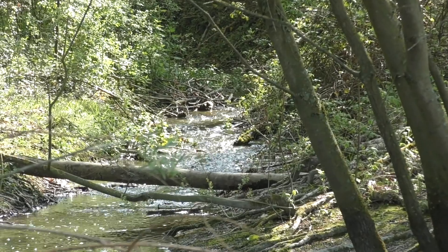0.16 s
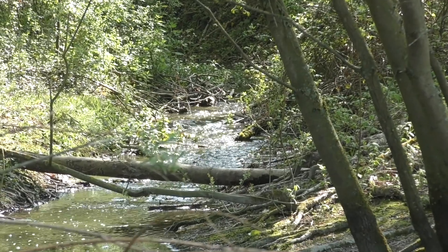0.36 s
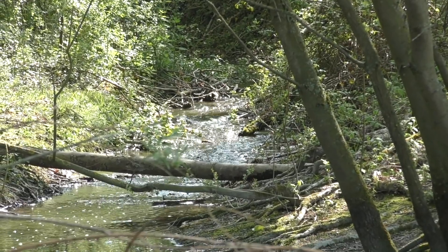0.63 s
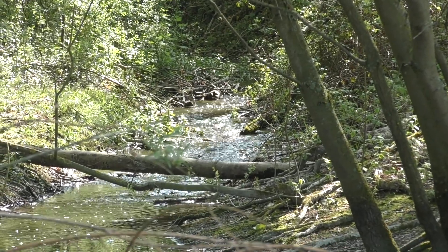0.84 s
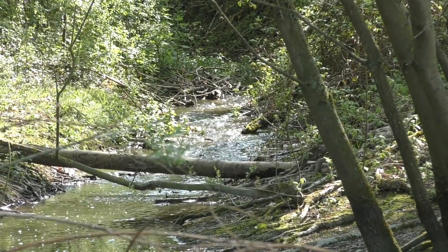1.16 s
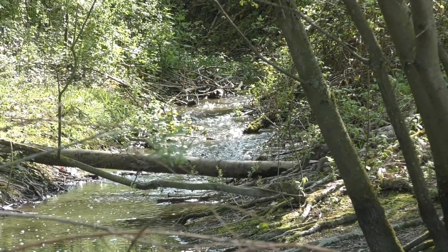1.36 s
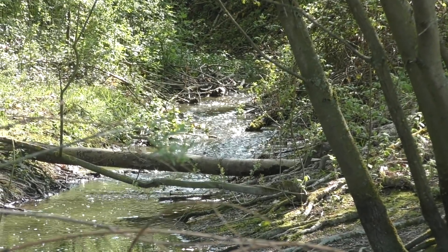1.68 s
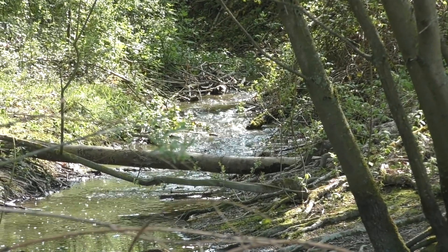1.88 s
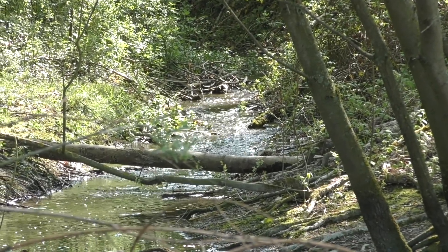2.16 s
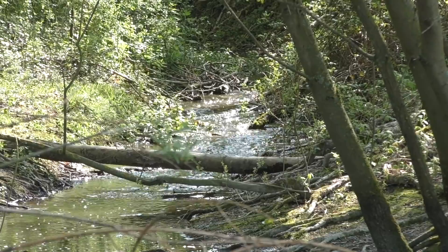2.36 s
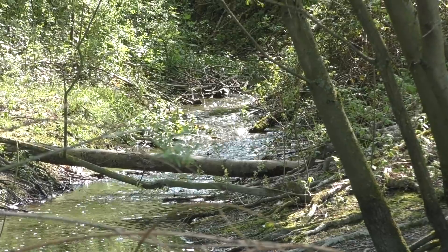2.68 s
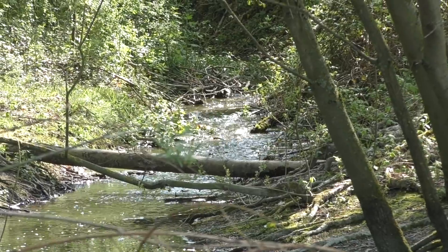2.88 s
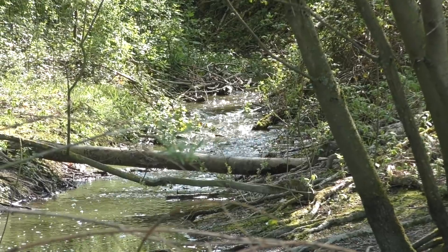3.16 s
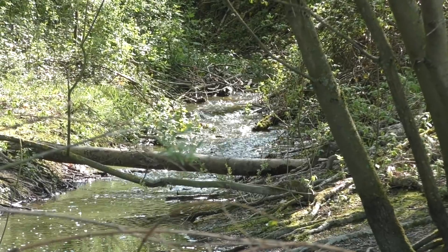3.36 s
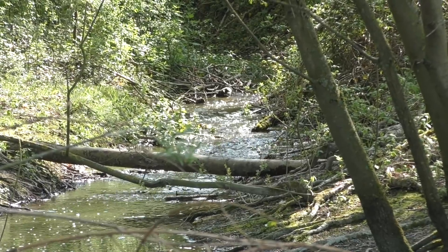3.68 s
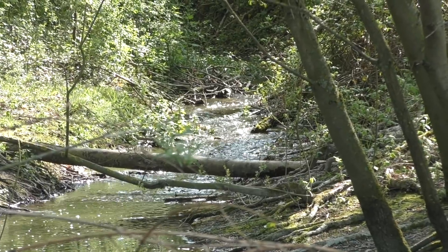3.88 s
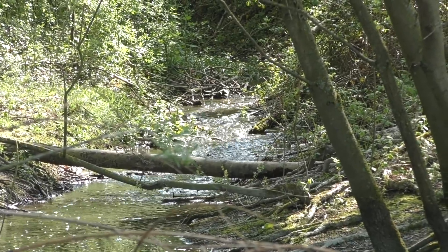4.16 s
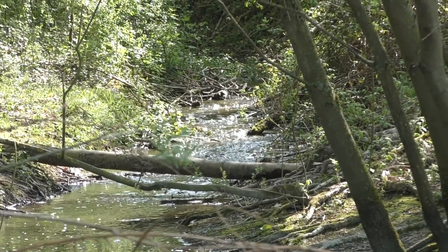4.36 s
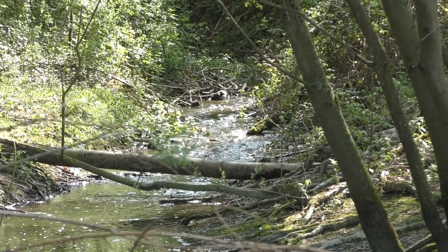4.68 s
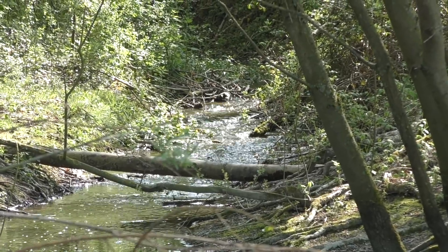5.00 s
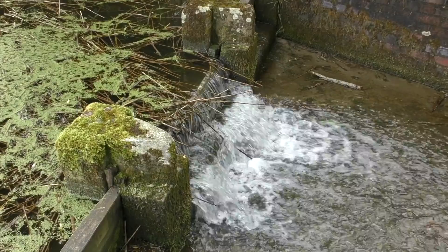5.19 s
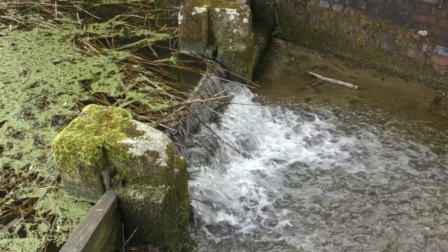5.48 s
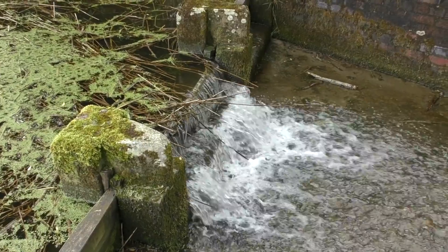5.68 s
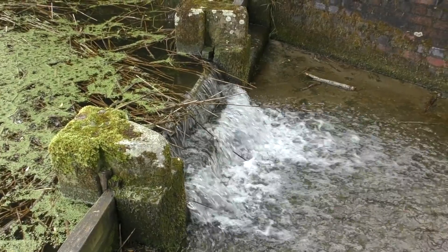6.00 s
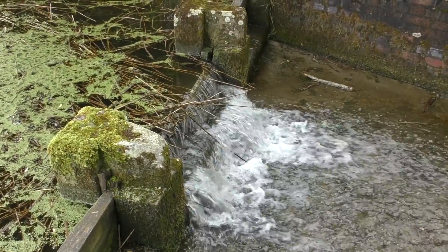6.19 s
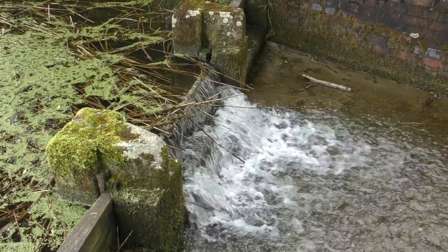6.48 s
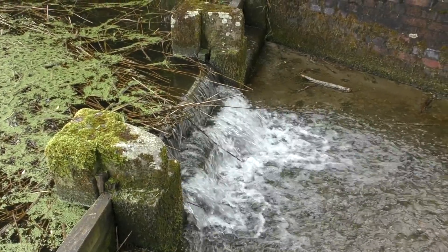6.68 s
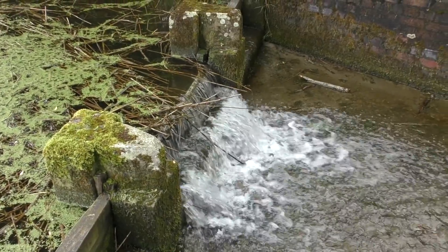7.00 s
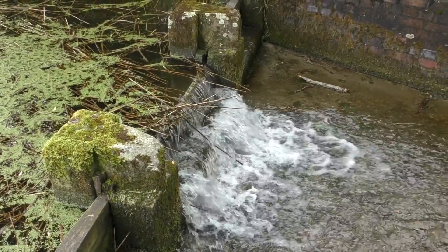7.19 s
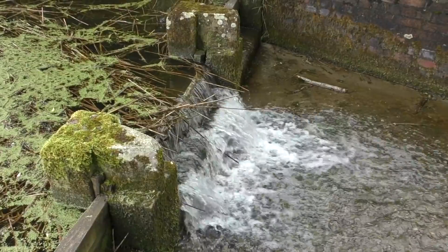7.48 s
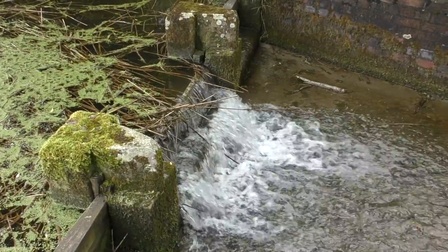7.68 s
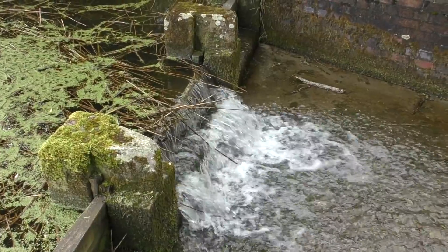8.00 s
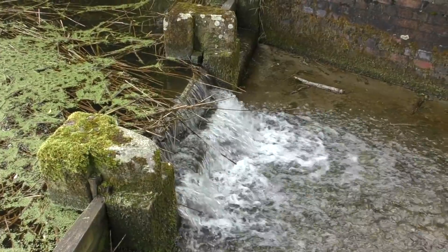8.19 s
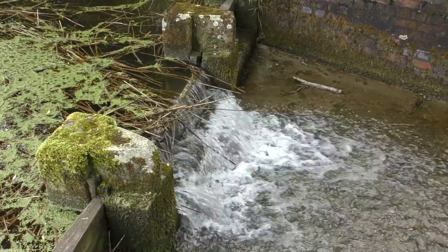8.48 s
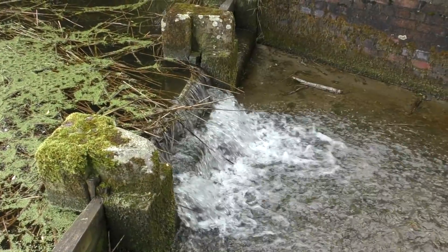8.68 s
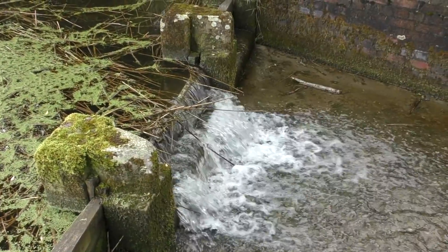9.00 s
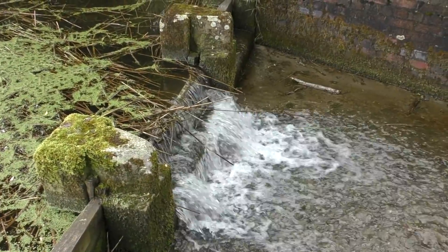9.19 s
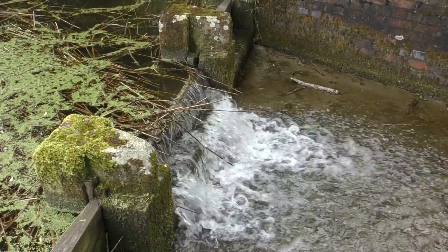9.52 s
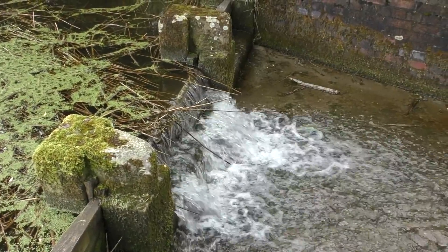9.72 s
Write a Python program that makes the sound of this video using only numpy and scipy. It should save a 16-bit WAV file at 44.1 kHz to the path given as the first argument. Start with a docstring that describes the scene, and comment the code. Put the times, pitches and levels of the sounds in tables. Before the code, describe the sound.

From 0 to 5.15 s a quiet wood, wide and echoing, with a distant brook's even wash and a low airy rumble that slowly eases. A small bird, slightly left, repeats a fast low-high see-saw phrase three times in the first 0.7 s; clear slurred whistles follow until about 2.7 s, while a buzzing, rapid trill runs from 1.0 to 2.2 s. Faint mewing cries come at 0.5-2.3 s, 3.5, 4.0 and 4.9 s, among distant peeps. Light handling ticks fall near 0.6, 2.4, 3.6 and 5.0 s. At 5.15 s it cuts abruptly to a loud, close, central weir: steady mid-range roar, dense bubbling and bright spray fizz, surging only slightly. Dull low handling bumps land at 5.16 and, stronger, 5.5 s, their rumble fading quickly. Watery gulps and short slaps poke out irregularly until the end near 10 s.

```python
"""Woodland birds, then a weir

Small birds sing a see-saw phrase, whistles and a trill in a wood, over a distant brook and farther cries.
Then, all at once, a low stone weir is close by: water plunges into a pool, with bubbles and fine spray.
Bird notes are sliding pure tones with echoes; the water is patchy noise, ringing bubbles and tiny impacts.
The hand-held camera ticks softly, mostly in the wood, and is bumped twice at the weir."""
import sys
import numpy as np
from scipy import signal
from scipy.fft import rfft, irfft, next_fast_len
from scipy.io import wavfile

SR = 44100
rng = np.random.default_rng(int(sys.argv[2]) if len(sys.argv) > 2 else 0)


def dump(signal):
    """Clip the signal to [-1, 1] and save it as 16-bit WAV at the path in sys.argv[1]."""
    limited = np.clip(np.atleast_2d(signal).T, -1, 1)
    pcm = np.round(limited * 32767).astype(np.int16)
    wavfile.write(sys.argv[1], SR, pcm)


N = 434385
TIME = np.arange(N) / SR  # seconds
WEIR_START = 5.153  # seconds

# Bird levels in these tables are set before among_trees() trims and places all the birds.
SEESAW_START, SEESAW_PERIOD_S = -0.031, 0.243  # the very start of the first phrase is cut off
# One see-saw phrase: a low note, an upward flick and a high note. Each row: delay in seconds, length in
# seconds, pitch in Hz, slide and bend as shares of the pitch, level in dB the first time round.
SEESAW_PHRASE = [(0, 0.09, 5220, -0.0047, 0.024, -46.5), (.02, 0.015, 5650, 0.14, -0.025, -48),
                 (.085, .09, 7600, -.02, -0.039, -50)]
# Slurred whistles. Each row: start in seconds, length in seconds, middle pitch in Hz, slide as a share of
# the pitch, level in dB.
WHISTLE_NOTES = [ (.13, .06, 7250, -.1, -55), (.712, .1, 3860, -0.003, -46.5),
                 (.885, 0.14, 5830, -0.009, -47.5), (.97, .1, 3185, -0.071, -56),
                 (1.39, 0.083, 4090, -0.031, -53), (1.525, 0.055, 3720, -.11, -53),
                 (1.65, 0.037, 3870, 0.14, -56), (2.19, .13, 7060, -0.064, -52.5),
                 (2.36, 0.09, 2500, -0.063, -61), (2.565, .03, 5200, -.19, -63),
                 (2.625, .04, 4130, 0.069, -53), (2.705, .032, 3370, 0.038, -61),
                 (4.23, 0.19, 3500, .005, -68)]
TRILL_START, TRILL_RATE, TRILL_DB = 1.04, 10.4, -49.5  # seconds, syllables a second, dB
# The range one trill syllable buzzes over. Each row: share of the syllable, low limit in Hz, high limit in Hz.
SYLLABLE_RANGE = [(0, 5600, 6400), (.18, 4800, 6050), (.38, 4366, 5520), (.75, 4430, 5200), (1, 4350, 5850)]
# Mewing cries. Each row: start in seconds, length in seconds, middle pitch in Hz, slide as a share of the
# pitch, level in dB, level of the octave in dB above that.
CRY_NOTES = [ (.545, .085, 2060, -.02, -58, -20), (.555, 0.056, 2276, 0.045, -60, -20),
             (.82, 0.2, 1675, -0.037, -65.5, -2), (1.262, .15, 1810, -0.018, -67, -11),
             (2.109, 0.24, 1660, -0.088, -61, -0.5), (2.221, 0.099, 1800, -0.045, -66, -12),
             (3.496, .14, 1863, .04, -69, 2), (4.04, .15, 1900, -0.015, -67, -5),
             (4.851, 0.11, 1936, -0.029, -61.5, -5.5), (5.08, 0.055, 1990, -0.12, -61, -15)]
# How long the echo tail rings among the trees. Each row: frequency in Hz, seconds to fall by 60 dB.
TREE_DECAY = [(1000, 0.41), (4000, 1), (8000, 1)]

# The tone of the plunging water; only its shape counts. Each row: frequency in Hz, strength in dB per Hz.
PLUNGE_SPECTRUM = [(12, -36), (20, 1.5), (86, -20), (156, -8), (197, -14), (226, -7.5), (305, -6),
                   (385, -1.5), (611, -2), (770, -1.5), (926, 0.5), (1540, -2), (3620, -4), (4250, -7),
                   (5000, -21.5), (6500, -55), (11000, -120)]
PLUNGE_DB = -22  # before the surges
# The tone of the spray; only its shape counts. Each row: frequency in Hz, strength in dB per Hz.
SPRAY_SPECTRUM = [(2940, -15.5), (5000, -10.5), (5870, 2), (6580, -9), (8220, -6), (11500, -12),
                  (15500, -25)]
SPRAY_DB = -37  # before the surges
SURGE_DB, SURGE_S = 0.28, 0.41  # typical depth of the random surges, and how long each one lasts roughly
# The largest air pockets gulping in the pool. Each row: start in seconds, level in dB before a trim shared
# by all gulps, pitch in Hz.
GULP_EVENTS = [(5.903, -18, 615), (6.047, -27, 556), (6.251, -16, 603), (6.437, -18.5, 427),
               (6.714, -18, 348), (8.038, -18.5, 412), (8.373, -22, 525), (8.573, -27, 560),
               (8.705, -27, 636), (8.789, -17, 537), (9.149, -17, 485), (9.333, -14.5, 448)]
# Lumps of water slapping the pool. Each row: start in seconds, level in dB relative to the other slaps.
SLAP_EVENTS = [(5.516, -5), (5.804, -11), (6.49, -7), (6.563, -11), (7.464, -7.5), (7.643, -5.5),
               (7.997, -14), (8.404, -6.5), (8.55, -9), (9.147, -7.5)]
# The tone of a slap; only its shape counts. Each row: frequency in Hz, strength in dB per Hz.
SLAP_SPECTRUM = [(200, -37), (800, -4), (1500, 8.0), (2500, -2.0), (4000, -13), (5000, -24), (12000, -32)]

# Small ticks of the camera body. Each row: start in seconds, knock level in dB, knock pitch in Hz, level in
# dB of the click's noise before it is filtered.
CAMERA_TICKS = [(.589, -33, 332, -58), (2.449, -35, 320, -60), (2.757, -52, 300, -59),
                (3.567, -35, 300, -49), (4.079, -55, 250, -40), (4.98, -40.5, 370, -64)]
# Dull bumps on the camera. Each row: start in seconds, level in dB, seconds to fall by 60 dB, rumble level
# in dB.
CAMERA_BUMPS = [(5.158, -27.5, 0.21, -34), (5.498, -21.5, 0.55, -37.5)]
# The tones a bump rings in the mount. Each row: pitch in Hz, level in dB relative to the bump, share of the
# bump's fall time.
MOUNT_MODES = [(82.3, 0.5, 1), (116, -5, .6), (146, -10, 0.56)]
# The tone of the rumble from the hand; only its shape counts. Each row: frequency in Hz, strength in dB per Hz.
HAND_SPECTRUM = [(5, -13.5), (20, 12), (55, -5), (130, 2.0), (220, -33), (1000, -80)]

# The tone of the background in the wood; only its shape counts. Each row: frequency in Hz, strength in dB
# per Hz.
WOOD_SPECTRUM = [(20, -11), (64, 7), (165, 3), (290, -2), (335, -1), (460, -8), (570, -12.5), (830, -13.5),
                 (1130, -8.5), (2800, -16), (3600, -17.5), (6200, -31.5), (11500, -28), (15500, -28.5)]
WOOD_DB = -52  # before the low rumble is set to its own level
RUMBLE_DB, RUMBLE_EASE_DB_PER_S = -55.5, 0.84  # level at first, and the loss a second
# How wide the wood sounds. Each row: frequency in Hz, level in dB of the side signal against the middle.
WOOD_WIDTH = [(60, -5), (110, -4), (200, -7), (380, -9.5), (700, -12), (1290, -7.5), (2380, -6), (4400, -4),
              (8120, -14), (15000, 1)]


def amp(db):
    """Turns decibels into a gain."""
    return 10 ** (np.asarray(db) / 20)


def unit(x):
    """Scales a sound to an average (rms) level of 1."""
    return x / np.sqrt(np.mean(x ** 2) + 1e-20)


def read(points, hz):
    """Reads a two-column table at any frequency, in straight lines on a log-frequency axis."""
    f, value = np.transpose(points)
    return np.interp(np.log(hz + 1), np.log(f + 1), value)


def add(mix, s, sound):
    """Adds a sound to the mix at time s, cutting off whatever falls outside."""
    start = round(s * SR)
    sound = sound[max(-start, 0):]
    part = mix[max(start, 0):][:len(sound)]
    part += sound[:len(part)]


def shape(x, spectrum):
    """Weakens or strengthens each frequency by a table in dB."""
    size = next_fast_len(N + 4096)
    gain = amp(read(spectrum, np.fft.rfftfreq(size, 1 / SR)))
    return irfft(rfft(x, size) * gain, size)[:N]


def colour(x, spectrum):
    """Shapes a sound by a spectrum, then scales it to rms 1."""
    return unit(shape(x, spectrum))


def smooth(x, steps):
    """Makes random values drift, each one remembering the last few steps; rms 1."""
    return unit(signal.lfilter([1], [1, -np.exp(-1 / steps)], x))


def glide(length, hz, slide, bend, waver=0.0081):
    """Phase of a note sliding through its middle pitch, bent into an arch (bend > 0) or a dip."""
    u = np.linspace(-1, 1, int(length * SR))
    pitch = hz * (1 + slide * u / 2 - bend * u ** 2)
    drift = smooth(rng.standard_normal(SR), 62)[:len(u)]
    pitch = pitch * (1 + waver * drift)
    return 2 * np.pi * np.cumsum(pitch) / SR


def note(phase, db, edges=0.14):
    """A pure tone with soft ends; edges is the share of it spent fading in and out."""
    return amp(db) * unit(np.sin(phase) * signal.windows.tukey(len(phase), edges))


def seesaw(count=3, fade_db=-1.0):
    """One bird repeats its low-high phrase at an even pace, a little softer each time."""
    out = np.zeros(N)
    for k in range(count):
        phrase_start = SEESAW_START + k * SEESAW_PERIOD_S
        for delay, length, hz, slide, bend, db in SEESAW_PHRASE:
            phase = glide(length, hz, slide, bend, waver=.016)
            add(out, phrase_start + delay, note(phase, db + k * fade_db))
    return out


def whistles(arch=0.0126):
    """Single slurred notes, pure tones whose pitch is slightly arched."""
    out = np.zeros(N)
    for s, length, hz, slide, db in WHISTLE_NOTES:
        add(out, s, note(glide(length, hz, slide, arch), db))
    return out


def trill(count=12, high_db=-5, buzz_hz=143):
    """A run of like syllables: the pitch buzzes fast between a low and a high limit, softer up high."""
    out = np.zeros(N)
    u = np.linspace(0, 1, int(SR / TRILL_RATE))
    share, *limits = np.transpose(SYLLABLE_RANGE)
    low_hz, high_hz = (np.interp(u, share, limit) for limit in limits)
    for k in range(count):
        # each syllable buzzes at a slightly different speed
        cycles = buzz_hz * u / TRILL_RATE * rng.uniform(.9, 1.1)
        buzz = np.sin(np.pi * (cycles + rng.random())) ** 2
        hz = low_hz + (high_hz - low_hz) * buzz
        softening = amp(high_db * (hz - hz.min()) / np.ptp(hz))
        tone = np.sin(2 * np.pi * np.cumsum(hz) / SR) * softening
        syllable = unit(tone * signal.windows.tukey(len(u), .12))
        add(out, TRILL_START + k / TRILL_RATE, amp(TRILL_DB) * syllable)
    return out


def cries(arch=0.0395):
    """A farther bird's mewing cries: an arched tone and its octave."""
    out = np.zeros(N)
    for s, length, hz, slide, db, octave_db in CRY_NOTES:
        phase = glide(length, hz, slide, arch, waver=0.0071)
        octave = note(2 * phase, db + octave_db, edges=0.44)
        add(out, s, note(phase, db, edges=0.19) + octave)
    return out


def far_birds(count=12, centre_hz=3500, scatter=0.0402, length_s=0.124, slide=.04, level_db=-71):
    """Faint peeps from deep in the wood: short soft-edged tones at loose intervals."""
    out = np.zeros(N)
    for k, (when, pitch, tilt) in enumerate(rng.uniform(-0.9, 1, (count, 3))):
        phase = glide(length_s, centre_hz * (1 + scatter * pitch), slide * tilt, 0)
        s = (k + .5 + when / 2) * WEIR_START / count
        add(out, s, note(phase, level_db, edges=.5))
    return out


def echoes(x, early_db=-4, tail_db=-7, early_s=0.065):
    """Near trunks scatter a cluster of early echoes; the wood beyond adds a long tail."""
    t = np.arange(SR) / SR
    # about 2500 echoes a second, of random strength
    early, late = rng.standard_normal((2, SR)) * (rng.random((2, SR)) < 2500 / SR)
    hz, age, z = signal.stft(late, SR, nperseg=256)
    fall_db = -60 * age / read(TREE_DECAY, hz)[:, None]
    tail = signal.istft(z * amp(fall_db), SR)[1][:SR]
    response = amp(early_db) * unit(early * np.exp(-t / early_s)) + amp(tail_db) * unit(tail)
    return signal.oaconvolve(x, response / np.sqrt(SR))[:N]


def among_trees(song, direct_db=-4.0, side_db=-5, left_db=1.0):
    """The birds sit a little to the left; their echoes come from all sides."""
    mid = amp(direct_db) * song + echoes(song)
    side = amp(side_db) * echoes(song)
    return np.array([amp(left_db) * (mid + side), amp(-left_db) * (mid - side)])


def weir(bubble_db=0, drop_db=-5, spray_follow=0.86):
    """Churning foam and bubbles make the roar; bursting droplets make the fizz above it."""
    # the flow over the sill surges at random
    surge_db = SURGE_DB * smooth(rng.standard_normal(N), SURGE_S * SR)
    foam = churn(patch_db=1.4, patch_s=0.0082, patch_hz=500, flicker_db=0.9, flicker_s=0.0075)
    ringing = bubbles(per_s=7000, spread_db=2.0, cycles=6.4, rise=0.033, small_bias=1.3)
    roar = colour(foam + amp(bubble_db) * ringing, PLUNGE_SPECTRUM) * amp(PLUNGE_DB + surge_db)
    mist = churn(patch_db=1.6, patch_s=0.012, patch_hz=1200, flicker_db=0.36, flicker_s=0.004)
    drops = unit(impacts(per_s=2400, spread_db=5.5))
    fizz = colour(mist + amp(drop_db) * drops, SPRAY_SPECTRUM) * amp(SPRAY_DB + spray_follow * surge_db)
    return roar + fizz + splashes()


def churn(patch_db, patch_s, patch_hz, flicker_db, flicker_s):
    """White noise broken into patches of time and frequency, with a flicker shared by all bands."""
    z = signal.stft(rng.standard_normal(N), nperseg=256, noverlap=192)[2]
    frame_s, bin_hz = 64 / SR, SR / 256
    over_time = smooth(rng.standard_normal(z.shape), patch_s / frame_s)
    patches = smooth(over_time.T, patch_hz / bin_hz).T
    flicker = smooth(rng.standard_normal(z.shape[1]), flicker_s / frame_s)
    gain = amp(patch_db * patches + flicker_db * flicker)
    return unit(signal.istft(z * gain, nperseg=256, noverlap=192)[1][:N])


def impacts(per_s, spread_db):
    """Random impulses of either sign, mostly small and a few large."""
    chance, size = rng.random(N), rng.exponential(1, N)
    strength = amp(spread_db * np.minimum(size, 4))
    return (chance < per_s / SR) * strength * rng.choice([-1, 1], N)


def bubble(hz, cycles, rise):
    """An air pocket rings a few cycles, rising in pitch as it nears the surface."""
    age = np.arange(int(5 * cycles * SR / hz)) * hz / SR  # in cycles
    return np.sin(2 * np.pi * age * (1 + rise * age / cycles / 2)) * np.exp(-age / cycles)


def bubbles(per_s, spread_db, cycles, rise, small_bias, count=38):
    """A cloud of bubbles: large low ones are rare, small high ones crowd together."""
    pitches, out = np.geomspace(150, 4800, count), np.zeros(N)
    births = impacts(per_s, spread_db)
    shares = np.cumsum(pitches ** small_bias)
    kind = np.searchsorted(shares / shares[-1], rng.random(N))  # which pitch each birth gets
    for k, hz in enumerate(pitches):
        group = signal.oaconvolve(births * (kind == k), bubble(hz, cycles, rise))[:N]
        out += np.sqrt(hz) * unit(group)
    return unit(out)


def splashes(gulp_db=-4, slap_db=-7, slap_s=0.0034):
    """Single gulps and slaps stand out of the roar; a slap swells and dies within milliseconds."""
    out, t = np.zeros(N), np.arange(SR // 20) / SR
    for s, db, hz in GULP_EVENTS:
        add(out, s, amp(db + gulp_db) * bubble(hz, cycles=4.7, rise=.02))
    noise = colour(rng.standard_normal(N), SLAP_SPECTRUM)
    swell = t / slap_s * np.exp(1 - t / slap_s)
    for s, db in SLAP_EVENTS:
        burst = np.roll(noise, -round(s * SR))[:len(t)]  # a different piece of noise each time
        add(out, s, amp(db + slap_db) * burst * swell / 2)
    return out


def camera(knock_s=0.0024, click_s=.0015):
    """Fingers tick on the housing; heavier bumps ring the low modes of the mount."""
    out, t = np.zeros(N), np.arange(SR // 2) / SR
    click_filter = signal.butter(2, 7000, fs=SR, output="sos")  # keeps what lies below 7 kHz
    for s, knock_db, hz, click_db in CAMERA_TICKS:
        knock = np.sin(2 * np.pi * hz * t) * np.exp(-t / knock_s)
        click = signal.sosfilt(click_filter, rng.standard_normal(len(t))) * np.exp(-t / click_s)
        add(out, s, amp(knock_db) * knock + amp(click_db) * click)
    for s, db, t60, _ in CAMERA_BUMPS:
        for hz, mode_db, share in MOUNT_MODES:
            fading = amp(db + mode_db - 60 * t / (t60 * share))
            add(out, s, fading * np.sin(2 * np.pi * hz * t))
    return out


def hand(ease_db_per_s=48, settle_db=-54, settle_db_per_s=14):
    """Each bump leaves a deep rumble that dies quickly; a weaker one lingers while the grip settles."""
    level = amp(settle_db - settle_db_per_s * np.maximum(TIME - WEIR_START, 0))
    for s, _, _, rumble_db in CAMERA_BUMPS:
        since = np.maximum(TIME - s, 0)
        level = level + (TIME > s) * amp(rumble_db - ease_db_per_s * since)
    return level * colour(rng.standard_normal(N), HAND_SPECTRUM)


def wood(rumble_hz=300):
    """The far brook's even wash from all around, over a low rumble of air that slowly eases."""
    water = churn(patch_db=1.5, patch_s=0.052, patch_hz=400, flicker_db=1.0, flicker_s=0.026)
    mid = amp(WOOD_DB) * colour(water, WOOD_SPECTRUM)
    side = amp(WOOD_DB) * colour(rng.standard_normal(N), WOOD_SPECTRUM)
    side = shape(side, WOOD_WIDTH)
    wash = np.array([mid + side, mid - side])
    low = signal.sosfiltfilt(signal.butter(2, rumble_hz, fs=SR, output="sos"), wash)
    rumble_gain = amp(RUMBLE_DB - RUMBLE_EASE_DB_PER_S * TIME) / np.std(low.mean(0))
    return wash + low * (rumble_gain - 1)  # swaps the low part for one at the rumble's own level


def scene(change_s=0.019):
    """The wide wood gives way to the weir dead ahead, in a very short crossfade."""
    at_weir = np.clip((TIME - WEIR_START) / change_s + .5, 0, 1)
    birds = seesaw() + whistles() + trill() + cries() + far_birds()
    forest = among_trees(birds) + wood()
    return (1 - at_weir) * forest + at_weir * (weir() + hand()) + camera()


def record(dry, edge_hz=15800):
    """A steep low-pass filter takes away the highest treble."""
    low_pass = signal.firwin(511, edge_hz, window=("kaiser", 9), fs=SR)
    return signal.oaconvolve(dry, low_pass[None], "same")


dry = scene()
out = record(dry)
dump(out)
```